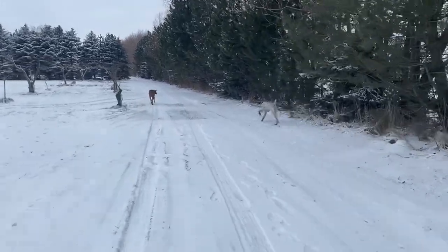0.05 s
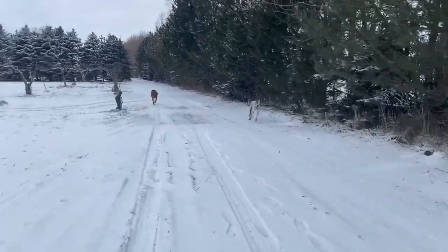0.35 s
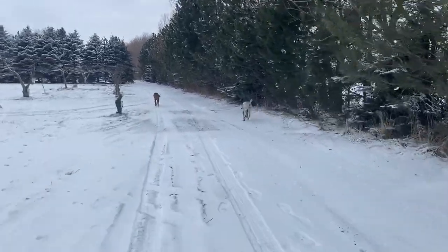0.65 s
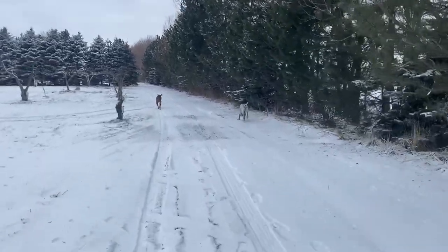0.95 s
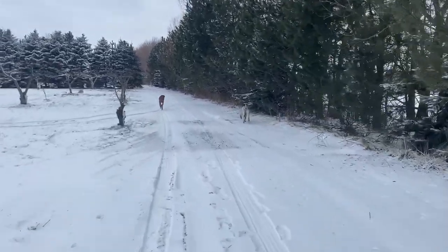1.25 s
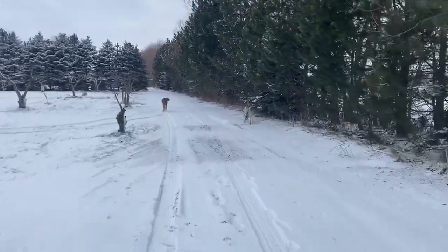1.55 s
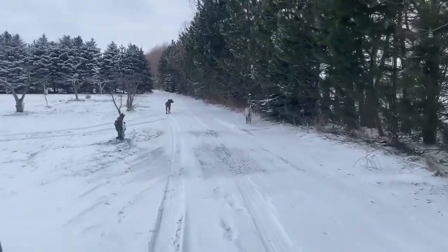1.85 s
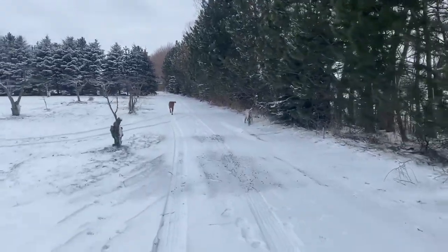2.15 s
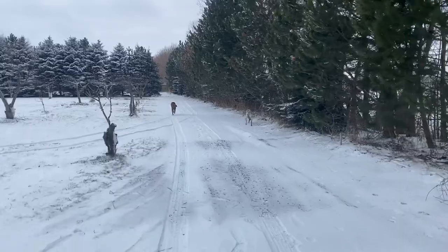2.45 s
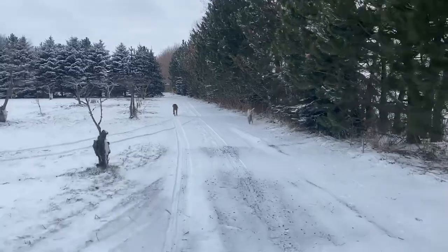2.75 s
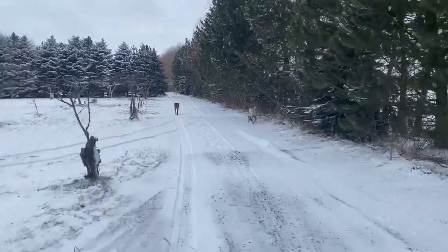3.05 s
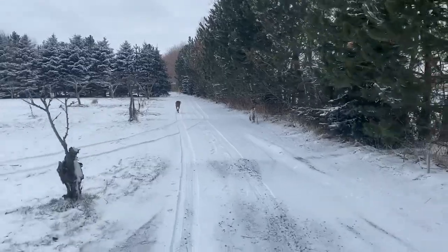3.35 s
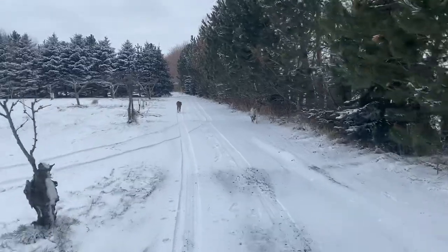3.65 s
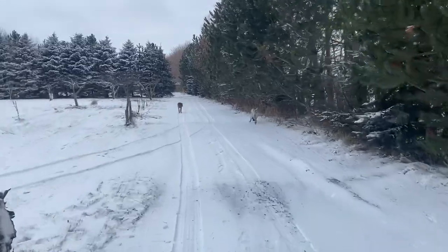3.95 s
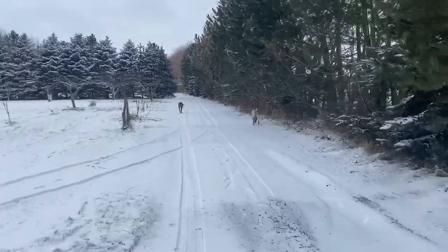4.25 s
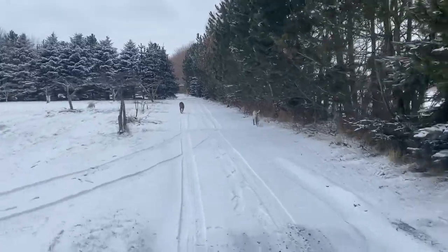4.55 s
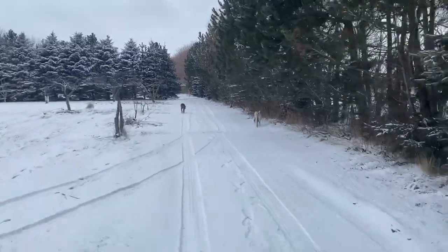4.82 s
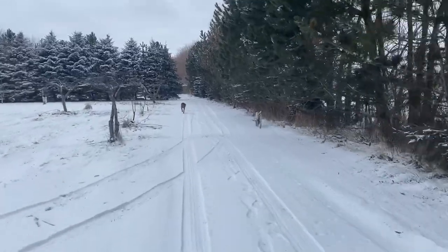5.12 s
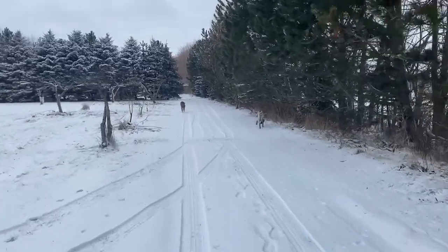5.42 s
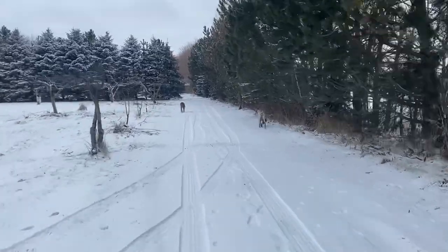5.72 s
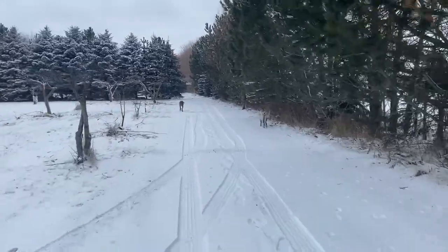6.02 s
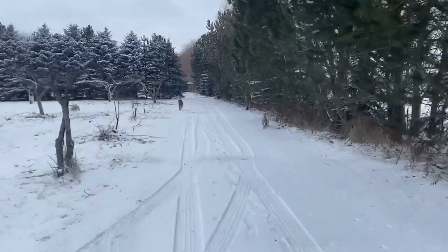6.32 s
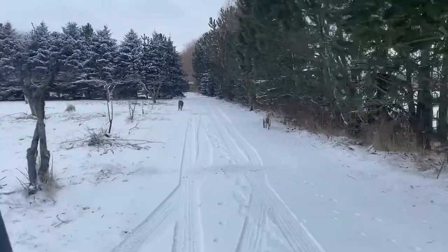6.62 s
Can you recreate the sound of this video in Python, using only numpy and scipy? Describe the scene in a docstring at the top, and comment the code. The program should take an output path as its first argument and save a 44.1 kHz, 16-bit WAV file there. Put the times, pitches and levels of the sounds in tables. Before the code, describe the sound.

Low rumble and booming jolts of a small vehicle on rutted snow, with crunching tyres, rattles, icy ticks and a faint whine.

```python
"""A ride on a small utility vehicle along a snowy farm track. From the start the ground shakes its body
into a rumble, the gears whine, the tyres hiss, fittings rattle and bits of ice tick on a panel.
Within a second the tyres crunch through crusted snow, loose parts knock and the first ruts jolt it.
After about 2 s the ground is at its roughest, so the body booms most, and ice brightens the crunches.
Around 4 s the faded whine returns and grit hisses under thin snow; near the end the track smooths out."""
import sys
import numpy as np
from scipy import signal
from scipy.fft import rfft, irfft, next_fast_len
from scipy.io import wavfile
from scipy.ndimage import uniform_filter1d, map_coordinates

SR = 44100
rng = np.random.default_rng(int(sys.argv[2]) if len(sys.argv) > 2 else 0)


def master(y):
    """Save y as 16-bit WAV."""
    cut = np.clip(np.atleast_2d(y).T, -1, 1)
    pcm = np.round(cut * 32767)  # scale
    wavfile.write(sys.argv[1], SR, pcm.astype(np.int16))


N = 298998


def amp(db):
    """Turn decibels into a number to multiply a sound by."""
    return np.exp(np.asarray(db) * np.log(10) / 20)


def unit(x):
    """Scale a signal to an average strength (rms) of 1."""
    return x / np.sqrt(np.mean(x ** 2) + 1e-20)


def along(points, hz):
    """Read a (frequency, value) table at hz, spacing the octaves evenly."""
    f, v = np.transpose(points)
    return np.interp(np.log(hz + 1), np.log(f + 1), v)


def curve(rows):
    """Join (time, value) points with straight lines, one value per sample."""
    return np.interp(np.arange(N) / SR, *np.transpose(rows))


def wobble(rate):
    """A smooth curve through rate random values a second."""
    return map_coordinates(rng.standard_normal(int(N * rate / SR) + 4), [np.arange(N) * rate / SR])


def stretch(middle_s, half_width_s):
    """Rise from 0 to 1 and fall again as a patch of ground passes under the wheels."""
    return np.exp(-((np.arange(N) / SR - middle_s) / half_width_s) ** 2)


def filtered(x, response):
    """Turn each frequency of x up or down by response(frequency)."""
    size = next_fast_len(N + SR // 2)
    return irfft(rfft(x, size) * response(np.fft.rfftfreq(size, 1 / SR)), size)[..., :N]


def add(track, s, sound):
    """Mix a short sound into the track at s seconds."""
    start = max(round(s * SR), 0)
    room = track[:, start:start + sound.shape[-1]]
    room += sound[..., :room.shape[-1]]


# How unlike left and right are: (frequency [Hz], unshared part against shared part [dB])
STEREO_WIDTH = [(90, -67.5), (190, -58.5), (330, -24.5), (550, -9), (900, 3.5), (2000, 0.84), (6000, -0.5)]
def stereo(pair, spectrum):
    """Shape two noises and mix them to left and right: alike in the bass, unrelated in the treble."""
    colour = lambda hz: amp(along(spectrum, hz)) / (1 + (hz / spectrum[-1][0]) ** 4)
    angle = lambda hz: np.arctan(amp(along(STEREO_WIDTH, hz)))
    mid, side = filtered(pair, lambda hz: colour(hz) * [np.cos(angle(hz)), np.sin(angle(hz))])
    return unit(np.array([mid + side, mid - side]))


def shaking(spectrum, span_s):
    """Random shaking whose strength is evened out over span_s seconds."""
    noise = stereo(rng.standard_normal((2, N)), spectrum)
    size = int(span_s * SR / 2) + 1
    power = uniform_filter1d(uniform_filter1d(noise[0] ** 2, size), size)
    return noise / np.sqrt(np.abs(power) + 1e-6)


# How bumpy the ground is: (time [s], roughness [dB])
ROUGHNESS = [(0, 0.5), (0.7, -1.5), (1.55, -3.5), (1.75, 0), (2.1, 3.5), (2.7, 3.5), (2.95, -2.5),
             (3.55, -4), (4.3, 0), (4.9, -1), (5.4, 0), (6.1, -4), (6.75, -3.5)]
# The tone of the shaking frame, cab and panels, each: (frequency [Hz], level [dB])
FRAME_RUMBLE = [(12, -25.5), (24, -0.5), (38, 24), (52, -11), (130, -52.5)]
CAB_DRONE = [(40, -8), (52, -9.5), (66, -3), (82, -5.5), (94, -1), (108, -6.5), (135, -10.5), (300, -96.5)]
PANEL_BOOM = [(80, -48), (120, -5), (150, 1.5), (185, -5), (240, -9), (290, -16.5), (400, -21),
              (600, -28.5), (1200, -84.5)]
def body(crunch_boom_db=9):
    """Rough ground shakes the frame, cab and panels; the panels also boom at each crunch."""
    rough_db = curve(ROUGHNESS)
    rumble = amp(-40.5 + 0.6 * rough_db) * shaking(FRAME_RUMBLE, span_s=0.83)
    drone = amp(-20.5 + 0.91 * rough_db) * shaking(CAB_DRONE, span_s=0.49)
    boom_strength = np.hypot(amp(-27.5 + 1.11 * rough_db), amp(crunch_boom_db) * swells(CRUST_BREAKS))
    return rumble + drone + boom_strength * shaking(PANEL_BOOM, span_s=0.13)


# How loud the gears are: (time [s], level [dB])
WHINE_LEVEL = [(0, -45), (3.3, -66), (4.1, -41.5), (6.7, -37)]
def gear_whine(pitch_hz=524, level_db=-4, octave_db=-21, flutter_db=4.5):
    """The gears sing a note and its octave; slack between the teeth and bumps make it unsteady."""
    speed = 1 + .025 * wobble(28) + .085 * wobble(190)
    phase = 2 * np.pi * np.cumsum(pitch_hz * speed) / SR
    flutter = flutter_db * np.array([wobble(30), wobble(30)])
    strength = amp(curve(WHINE_LEVEL) + level_db + flutter)
    return strength * np.sqrt(2) * (np.sin(phase) + amp(octave_db) * np.sin(2 * phase))


# How loud the rolling tyres are: (time [s], level [dB])
ROLL_LEVEL = [(0, -53.5), (0.6, -54), (1.2, -58), (2.7, -44.5), (3.42, -58.5), (3.8, -46), (4.4, -47.5),
              (5.4, -49.5), (6.2, -53), (6.7, -54)]
# The tone of tyres on packed snow: (frequency [Hz], level [dB])
SNOW_HISS = [(200, -13), (400, -11.5), (540, 3), (700, -0.5), (900, -5), (1150, -10), (1500, -15),
             (1850, -15.5), (3300, -33), (5300, -37), (8000, -46.5)]
def rolling(level_db=5, lumps_db=3.0):
    """The tyres pack the snow with a lumpy hiss and grind over a patch of grit."""
    snow = amp(curve(ROLL_LEVEL) + level_db) * stereo(rng.standard_normal((2, N)), SNOW_HISS)
    return (snow + grit()) * amp(lumps_db * wobble(45))


def rattle(count, low_hz, high_hz, db_per_octave, cycles, level_db, scatter_db=6.5):
    """Loose fittings chatter at random pitches, harder when the tyres roll and crunch harder."""
    force = np.hypot(amp(curve(ROLL_LEVEL)), swells(CRUST_BREAKS))
    when, pitch = rng.random((count, 2)).T
    hz = low_hz * (high_hz / low_hz) ** pitch
    db = 20 * np.log10(force[(when * N).astype(int)]) + db_per_octave * np.log2(hz / low_hz)
    db += scatter_db * np.clip(rng.standard_normal(count), -2, 2)
    return rings(np.column_stack([when * N / SR, db + level_db, hz]), cycles)


def rings(rows, cycles):
    """Each (time, level, pitch) note builds over a few cycles and dies; high ones differ left to right."""
    track, t = np.zeros((2, N)), np.arange(SR // 6) / SR
    for (s, db, hz), (phase, side) in zip(rows, rng.uniform(-np.pi, np.pi, (len(rows), 2))):
        age = t[t < 8 * cycles / hz] * hz / cycles  # 1 at the loudest moment
        lag = np.sign(side) * 2 * np.arctan(amp(along(STEREO_WIDTH, hz)))
        tone = np.sin(2 * np.pi * cycles * age + phase + np.array([[0], [lag]]))
        add(track, s - cycles / hz, amp(db) * (age * np.exp(1 - age)) ** 2 * tone)
    return track


def ice_chips(count=210, quiet_db=-54, in_crunch_db=-3, spread_db=11, fade_db_per_s=1.2):
    """Small chips patter on a panel, harder in each crunch, weaker as the track smooths out."""
    when, size = rng.random((count, 2)).T
    force = np.hypot(amp(quiet_db), amp(in_crunch_db) * swells(CRUST_BREAKS))
    s = when * N / SR
    db = 20 * np.log10(force[(when * N).astype(int)]) + spread_db * (size - .5) - fade_db_per_s * s
    return panel(zip(s, db), scatter_db=6.5)


def resonance(f, hz, width_hz):
    """How something that rings at hz answers each frequency f."""
    return 1j * f * width_hz / (hz * hz - f * f + 1j * f * width_hz)


# The notes a struck panel rings with: (pitch [Hz], level [dB])
PANEL_NOTES = [(1800, 12), (2700, 4), (3900, -2), (5250, 2), (6500, -8)]
def panel(hits, scatter_db, decay_s=0.02, attack_s=0.00027):
    """Each (time, level) bit of ice shatters and rings the panel; the notes vary with the spot struck."""
    track, t = np.zeros((2, N)), np.arange(SR // 10) / SR
    f = np.fft.rfftfreq(len(t), 1 / SR)
    note_hz, note_db = np.transpose(PANEL_NOTES)[..., None]
    for s, db in hits:
        hz = note_hz * (1 + 0.08 * rng.standard_normal(note_hz.shape))
        notes = resonance(f, hz, width_hz=0.15 * hz) / (1 + (f / 7500) ** 12)
        burst = rng.standard_normal((2, len(t))) * amp(-60 * t / decay_s) * (1 - np.exp(-t / attack_s))
        mix = amp(note_db + scatter_db * rng.standard_normal(hz.shape))
        ring = irfft(rfft(burst) * (mix * notes).sum(0), len(t))
        add(track, s, amp(db) * ring / np.abs(ring).max())
    return track


# Larger bits of ice hitting the panel: (time [s], level [dB])
ICE_HITS = [(0.04, -45), (0.171, -45), (0.376, -39.5), (0.495, -42), (0.691, -42.5), (1.262, -41),
            (1.486, -41.5), (1.596, -37), (1.661, -41.5), (1.783, -40), (1.879, -41.5), (1.964, -44),
            (2.002, -40.5), (2.137, -45), (2.62, -37), (2.68, -32.5), (2.975, -40), (3.036, -42),
            (3.249, -41), (3.64, -44), (3.737, -34), (4.011, -49), (4.609, -36), (5.107, -43.5),
            (5.457, -48)]
def ice_ticks(left_db=7.5, right_db=2):
    """The larger bits strike on the left side."""
    return panel(ICE_HITS, scatter_db=2) * amp([[left_db], [right_db]])


# The tyres breaking the snow's crust: (start time [s], rise time [s], level [dB])
CRUST_BREAKS = [(0.104, 0.015, -46.5), (0.483, 0.052, -39.5), (0.795, 0.028, -42.5), (0.864, 0.031, -39.5),
                (1.04, 0.031, -46), (1.211, 0.029, -38.5), (1.347, 0.043, -39.5), (1.634, 0.028, -42),
                (1.693, 0.039, -39), (1.826, 0.011, -35.5), (1.98, 0.019, -36.5), (2.03, .028, -34.5),
                (2.158, 0.028, -37.5), (2.448, 0.017, -40.5), (2.552, 0.044, -38), (2.669, 0.039, -35),
                (2.958, 0.012, -38), (3.032, 0.012, -41), (3.115, 0.05, -37.5), (3.315, 0.017, -39.5),
                (3.636, 0.019, -40.5), (3.797, 0.01, -38), (3.868, 0.019, -38), (4.038, 0.013, -34.5),
                (4.121, .009, -45.5), (4.166, 0.01, -39), (4.317, 0.013, -43), (4.677, 0.018, -36.5),
                (4.771, 0.013, -39.5), (4.82, 0.014, -36.5), (5.112, 0.02, -38.5), (5.808, 0.022, -36.5),
                (6.054, 0.012, -40), (6.368, 0.019, -37)]
# The tone of a crunch's dull and bright parts, each: (frequency [Hz], level [dB])
DULL_CRUSH = [(150, -1), (300, 9.5), (600, 5), (730, 0.5), (900, -2), (1100, -4.5), (1500, -8.5),
              (2000, -9), (2800, -21), (4000, -31.5), (7000, -78)]
BRIGHT_CRACKLE = [(1200, -16), (2800, 1.5), (3800, -0.5), (5300, -0.5), (6600, -7.5), (7600, -20),
                  (9000, -25.5), (12000, -49)]
def crunches(crush_db=5.5, crackle_db=-20.5, icy_db=8, clumps_db=2.5, fizz_db=-71.5):
    """Snow crystals snap in swarms: a dull crush under the tyre and a crackle that never quite stops."""
    breaking = np.hypot(swells(CRUST_BREAKS), swells(crumbs()))
    icy_lift_db = icy_db * stretch(middle_s=2.3, half_width_s=0.33)
    fizz = amp(fizz_db + curve(ROUGHNESS))
    crackle = np.hypot(amp(crackle_db + icy_lift_db) * breaking, fizz)
    dull = amp(crush_db) * breaking * stereo(snaps(per_second=4000), DULL_CRUSH)
    bright = crackle * stereo(snaps(per_second=8700), BRIGHT_CRACKLE)
    return (dull + bright) * amp(clumps_db * wobble(110))


def swells(rows, sharpness=1.13):
    """The strength of a run of crunches over time: each sets in quickly and lets go more slowly."""
    power = np.zeros((1, N))
    for s, rise, db in rows:
        age = np.arange(0, 5, 1 / max(rise * SR, 1))
        add(power, s, amp(db) ** 2 * (age * np.exp((1 - age * age) / 2)) ** sharpness)
    return np.sqrt(power[0])


def crumbs(count=110, rise_s=0.0092, level_db=-50.5, spread_db=7, fade_db=6):
    """Small lumps give way, weaker as the track smooths out: rows of (start time, rise time, level)."""
    when, length, size = rng.random((count, 3)).T
    s = when * N / SR
    rough_db = np.interp(s, *np.transpose(ROUGHNESS))
    db = level_db + rough_db + spread_db * (size - .5) - fade_db * when ** 2
    return zip(s, rise_s * 2 ** (2 * length - 1), db)


def snaps(per_second):
    """Snow crystals break in tiny clicks of random time and size."""
    return unit((rng.random(N) < per_second / SR) * rng.standard_normal((2, N)))


def clatter(x, depth_db=3.0):
    """Each lump breaks with its own pitches, so brief rings come and go across the sound."""
    slices = signal.stft(x, nperseg=512)[2]  # frequency by time
    patches = rng.standard_normal(slices.shape[1:])
    patches = unit(uniform_filter1d(uniform_filter1d(patches, 3, axis=0), 3, axis=1))
    gain = unit(amp(depth_db * np.clip(patches, -2, 2)))
    return signal.istft(slices * gain, nperseg=512)[1][:, :N]


def pressed(x, below_hz=620, growth=0.23):
    """On rough ground the wheels press harder, so the low part of their sound swells."""
    low = filtered(x, lambda hz: 1 / (1 + (hz / below_hz) ** 4))
    return x + (amp(growth * curve(ROUGHNESS)) - 1) * low


# Knocks of loose parts: (time of peak [s], level [dB], pitch [Hz])
PART_KNOCKS = [(0.382, -29, 468), (2.035, -24.5, 564), (2.205, -25.5, 706), (2.688, -25.5, 1050),
               (2.732, -23, 600), (3.987, -25.5, 605), (4.236, -26, 460), (5.006, -26, 500),
               (5.132, -31.5, 700), (5.366, -29.5, 643), (5.926, -28.5, 490)]
def knocks(cycles=3.1, buzz_db=4.0):
    """Loose parts knock and buzz against their mounts."""
    return rings(PART_KNOCKS, cycles) * amp(buzz_db * wobble(420))


# Ruts in the track: (time of peak [s], level [dB], hardness [0-1])
RUTS = [(0.534, -20, 1), (0.82, -11, 0.26), (0.941, -17.5, 0.36), (1.001, -21.5, 0.98), (1.391, -22, 0.92),
        (1.716, -21, 1), (1.762, -13.5, 0.82), (1.849, -15, 0.48), (2.06, -8, 0.35), (2.152, -17.5, 0.25),
        (2.198, -20, 1), (2.569, -12.5, 0), (2.635, -7.5, 0.25), (2.717, -11.5, 0), (2.741, -12.5, 0.53),
        (3.036, -18.5, 0), (3.189, -15, 0.45), (3.273, -13.5, 0.01), (3.444, -18, 0), (4.201, -21, 0),
        (5.841, -14.5, 0.46)]
# The body's deep notes: (pitch [Hz], level in a soft jolt [dB], level in a hard jolt [dB])
BODY_NOTES = [(91.9, 2, -14.5), (167, -8.5, 4), (257.3, -32.5, -2.5)]
def jolts(cycles=2.908, detune=0.07):
    """Each rut makes the body ring; a harder one brings out the higher notes."""
    s, db, hardness = np.transpose(RUTS)
    flex = 1 + detune * (2 * rng.random(len(s)) - 1)
    return sum(rings(np.column_stack([s, db + soft + hardness * (hard - soft), hz * flex]), cycles)
               for hz, soft, hard in BODY_NOTES)


# The tone of loose grit: (frequency [Hz], level [dB])
GRIT_HISS = [(550, -16.5), (1050, 2), (2000, -18.5), (3500, -29)]
def grit(level_db=-49.5):
    """Grit hisses under the tyres where the snow is thin."""
    thin_snow = stretch(middle_s=4.2, half_width_s=0.78)
    return amp(level_db) * thin_snow * stereo(rng.standard_normal((2, N)), GRIT_HISS)


# The hollow notes of the cab's air and lining: (pitch [Hz], boost [dB])
CAB_NOTES = [(595, 5), (740, 4), (1075, 4.5), (1240, 3.5), (1460, 2.5), (1850, 2), (5100, 3.5)]
def cab(x, width_hz=45, loss_db=-2.0):
    """The cab boosts its own notes in the sounds that pass through it."""
    response = lambda f: 1 + sum((amp(db) - 1) * resonance(f, hz, width_hz) for hz, db in CAB_NOTES)
    return amp(loss_db) * filtered(x, response)


def scene():
    """Everything rides along with the vehicle; tyres and rattles are heard through the cab."""
    low_rattle = rattle(count=170, low_hz=271, high_hz=1060, db_per_octave=-6.5, cycles=5.5, level_db=2.5)
    tyres = clatter(rolling() + pressed(crunches()))
    high_rattle = rattle(count=480, low_hz=480, high_hz=2600, db_per_octave=-7, cycles=6, level_db=4)
    through_cab = cab(tyres + pressed(low_rattle + high_rattle))
    return body() + jolts() + gear_whine() + through_cab + ice_ticks() + ice_chips() + knocks()


# Which side each frequency leans to: (frequency [Hz], left above right [dB])
BALANCE = [(600, 0), (1000, -1), (1400, -4.5), (2400, -1.5), (3600, 1), (5200, 3.5), (6600, 1), (8000, -4)]
def record(dry, fade_in_s=0.004, whistle_hz=12000, whistle_db=-67, top_hz=12400):
    """Fade in, tint left and right, add a faint high whistle that follows the rumble, and cut the top."""
    fade_in = np.sin(np.pi / 2 * np.minimum(np.arange(N) / SR / fade_in_s, 1)) ** 2
    heard = filtered(dry * fade_in, lambda hz: amp(np.outer([1, -1], along(BALANCE, hz)) / 2))
    whistle = amp(whistle_db) * heard * np.cos(2 * np.pi * whistle_hz * np.arange(N) / SR)
    return filtered(heard + whistle, lambda hz: hz < top_hz)


dry = scene()
out = record(dry)
master(out)
```